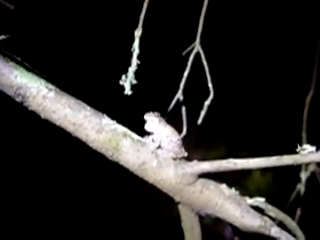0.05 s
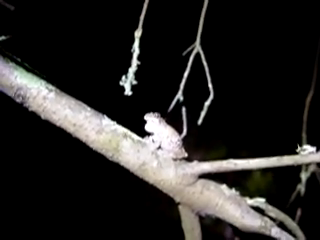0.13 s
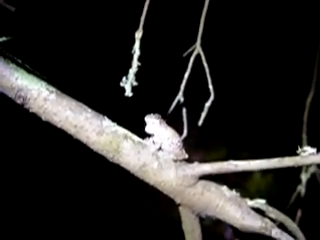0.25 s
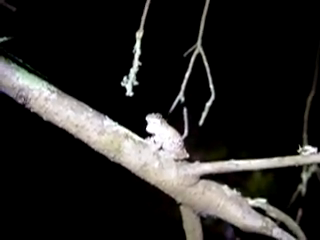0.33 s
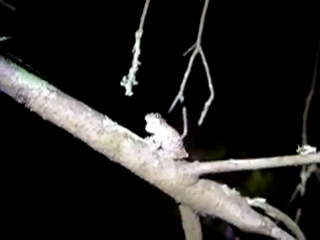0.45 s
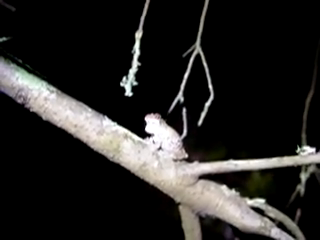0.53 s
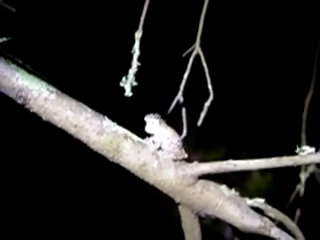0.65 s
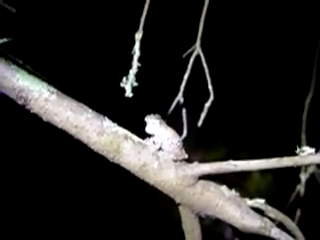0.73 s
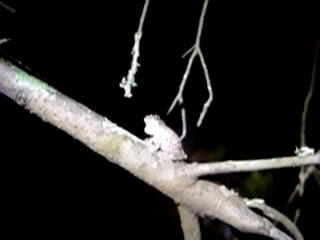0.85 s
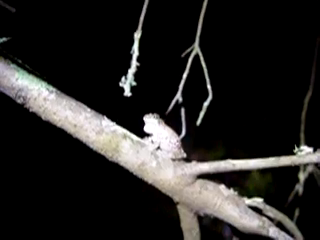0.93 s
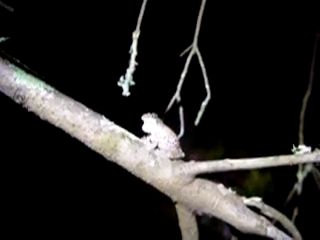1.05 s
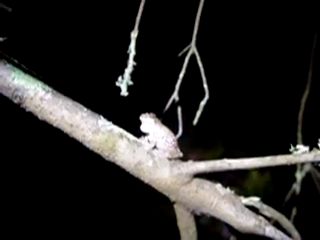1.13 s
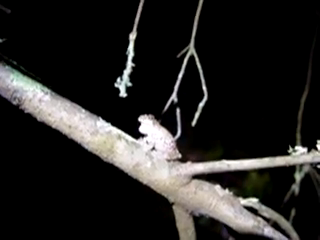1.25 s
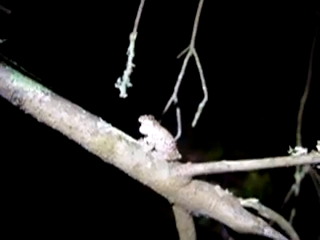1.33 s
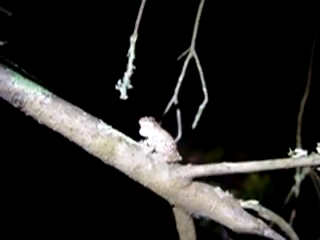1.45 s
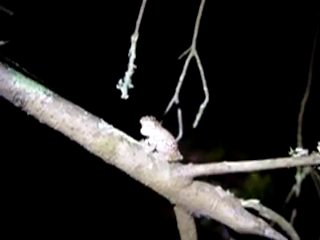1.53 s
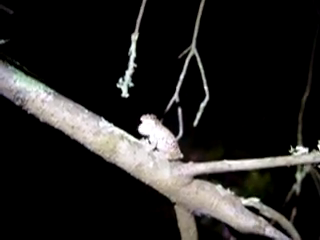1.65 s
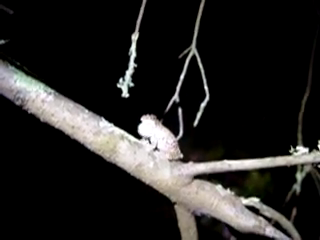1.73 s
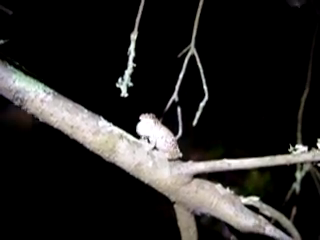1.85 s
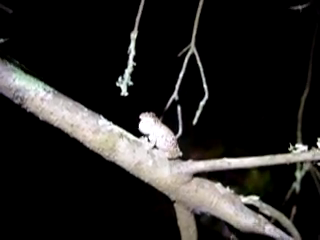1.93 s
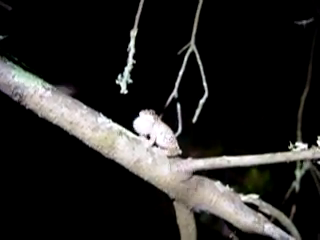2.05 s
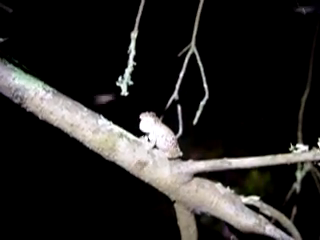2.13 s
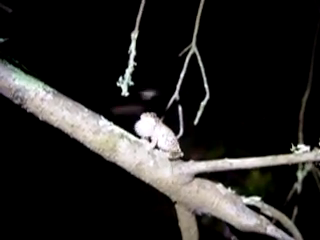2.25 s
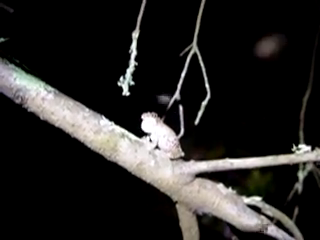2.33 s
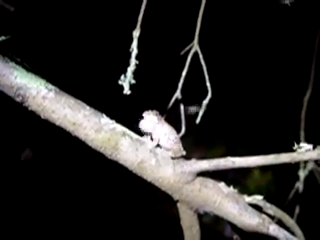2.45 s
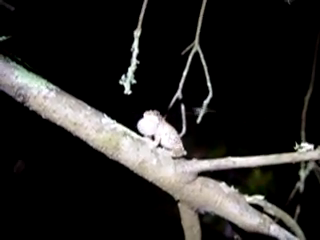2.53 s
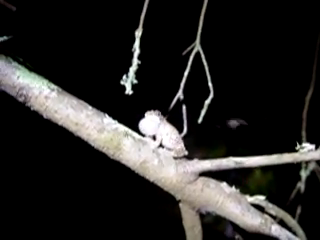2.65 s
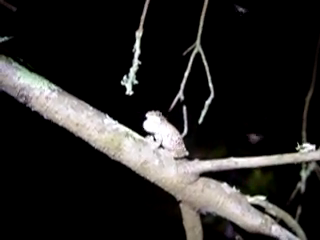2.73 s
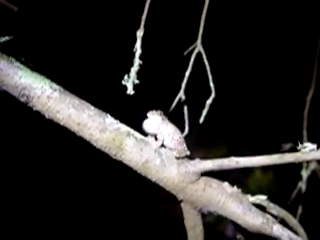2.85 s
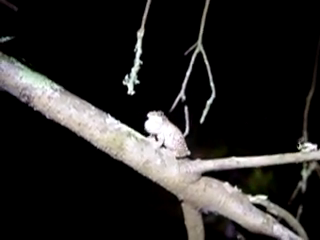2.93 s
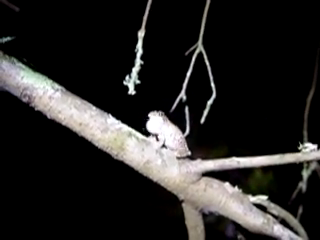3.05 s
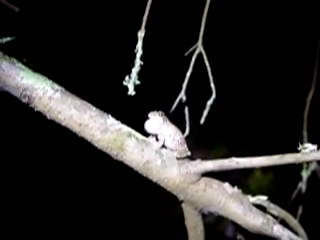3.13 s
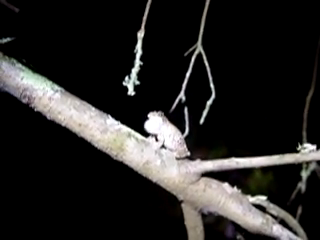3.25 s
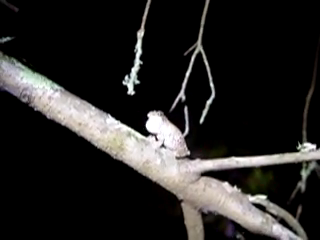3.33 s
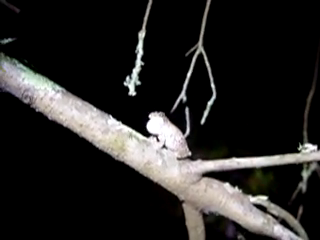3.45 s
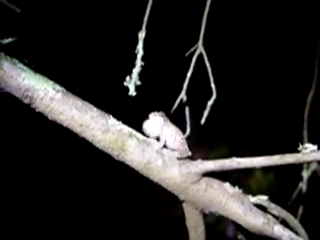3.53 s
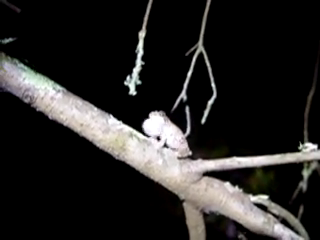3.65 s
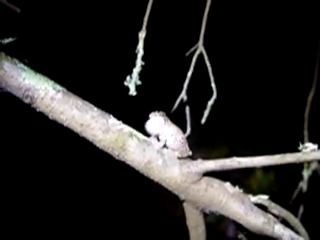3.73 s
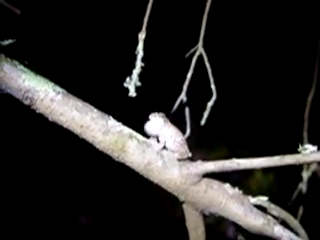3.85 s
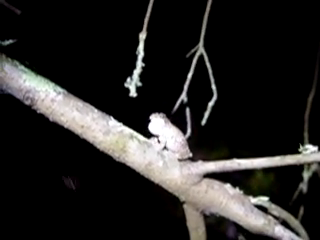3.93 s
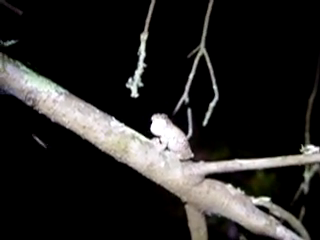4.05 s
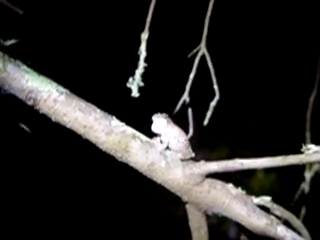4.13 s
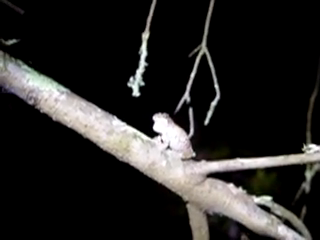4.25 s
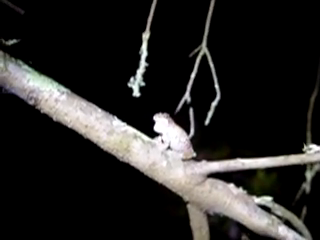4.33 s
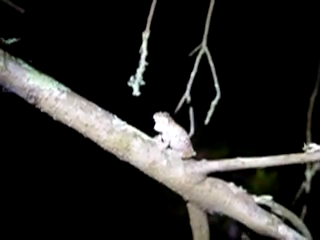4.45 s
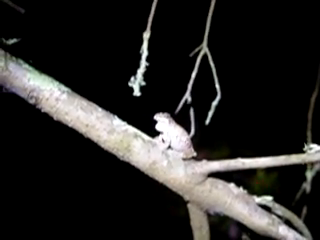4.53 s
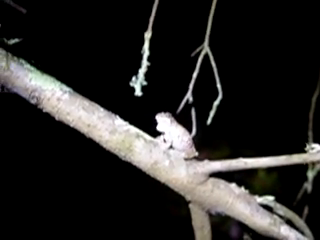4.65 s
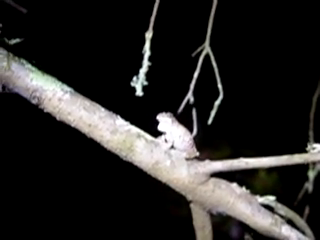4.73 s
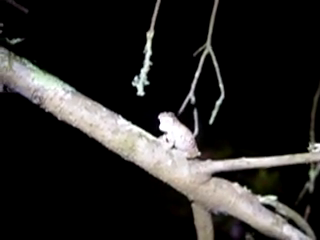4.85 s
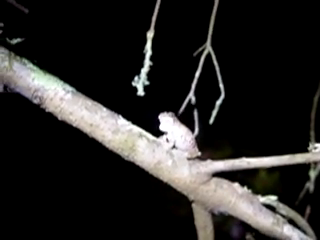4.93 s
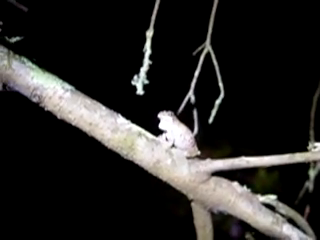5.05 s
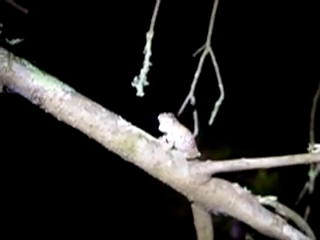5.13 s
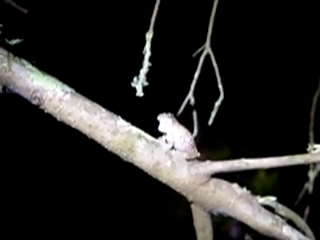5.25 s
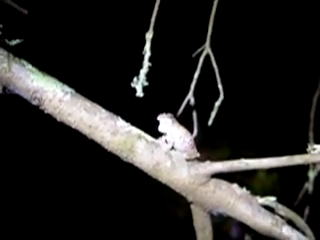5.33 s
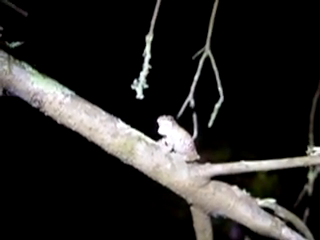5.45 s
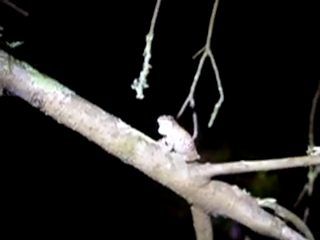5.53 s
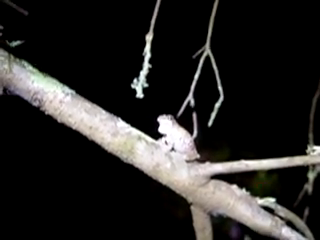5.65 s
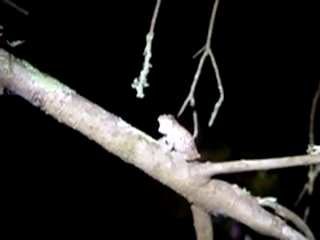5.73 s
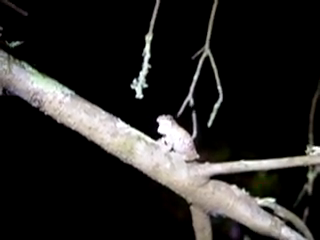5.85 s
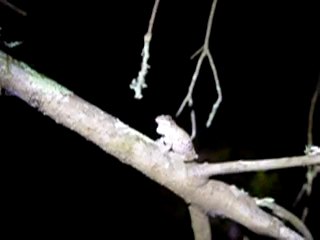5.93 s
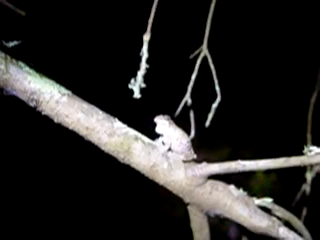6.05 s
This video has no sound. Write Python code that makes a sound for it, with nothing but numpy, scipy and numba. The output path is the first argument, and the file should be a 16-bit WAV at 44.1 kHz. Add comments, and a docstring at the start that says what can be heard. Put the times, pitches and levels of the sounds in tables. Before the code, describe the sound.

A wetland at night, with a continuous bed of insect buzz around 6 kHz, a shimmering crowd of frog clicks near 4.5 kHz, blurred far peeps, a low drone and faint soft hoots. From 0 to 1.85 s a neighbouring treefrog peeps about eight times a second near 2.4 kHz, each note swelling and rising. At 1.8 s a close treefrog begins: sixteen loud, pure peeps of about 50 ms, spaced unevenly at first, then roughly eight a second from 2.7 to 4.1 s, stronger and steadier in pitch, cutting off sharply. The microphone's gain drops, sinking the chorus, which slowly recovers. From 3.9 to 5.6 s a neighbour peeps rapidly again, joined from 4.3 s by longer, quavering distant whistles. Faint clucks at 5.1 s precede two short, low, ringing pulsed grunts at 5.65 and 5.9 s. Tiny close click rattles dot the whole.

```python
"""A treefrog on a branch close by whistles a run of loud peeps: short pure tones that swell, glide and shut off.
Its neighbours, on a wetland at night, peep and whistle further off, and another frog grunts twice in trains of
ringing pulses. Behind them are a chorus of decaying clicks, soft gliding hoots, and shaped noise for the insects,
blurred peeps, the low drone of far frogs and the night air.
The close peeps drive the recorder's gain control, so the chorus sinks and slowly comes back."""
import sys
import numpy as np
from scipy import signal
from scipy.fft import rfft, irfft, next_fast_len
from scipy.io import wavfile
from scipy.ndimage import uniform_filter1d, minimum_filter1d, map_coordinates
from numba import njit

SR = 44100
rng = np.random.default_rng(int(sys.argv[2]) if len(sys.argv) > 2 else 0)


def output_pcm(signal):
    """Save a mono or channel-first signal as 16-bit PCM at the path in sys.argv[1].

    Samples are clipped to [-1, 1] before scaling.
    """
    pcm = np.clip(np.atleast_2d(signal).T, -1, 1) * 32767
    wavfile.write(sys.argv[1], SR, np.round(pcm).astype(np.int16))


N = 268569  # length of the scene in samples

# Night air: frequency_hz, relative_level_db (per Hz)
AIR_SPECTRUM = [(20, -9), (60, -7), (150, -15.5), (270, -4), (350, -1), (600, -1.5), (1500, -2),
                (5000, -6.5), (9800, -21.5), (10500, -64.5)]
# Low drone of far frogs: frequency_hz, relative_level_db (per Hz)
DRONE_SPECTRUM = [(550, -36), (700, -16.5), (765, 5), (860, 3.5), (960, -7.5), (1150, -7.5), (1400, -24),
                  (1900, -45.5)]
# Blurred peeps of far frogs: frequency_hz, relative_level_db (per Hz)
FAR_PEEP_SPECTRUM = [(1700, -35.5), (2020, -6.5), (2200, 3.5), (2380, 0.5), (2480, 6.5), (2590, 2),
                     (2750, -3.5), (3200, -6.5), (3800, -51.5)]
# Buzzing insects: frequency_hz, relative_level_db (per Hz)
INSECT_SPECTRUM = [(4800, -22), (5300, -4.5), (5900, -0.5), (6470, 2), (6640, -11), (7150, -16),
                   (7700, -25.5), (8800, -27), (9600, -26), (10000, -39), (10400, -69.5)]
# Wash of the farthest clicking frogs: frequency_hz, relative_level_db (per Hz)
WASH_SPECTRUM = [(2600, -38), (3200, -20), (3700, -5.5), (4200, -1.5), (4680, 7), (4930, -23), (5200, -20),
                 (5800, -31.5), (7000, -50)]
# The loudest short rattles of the nearest clicking frogs: start_s, level_db
CLOSE_RATTLES = [(.082, -5.5), (.784, -10), (2.053, -5.5), (2.193, -14), (2.378, -6), (2.543, -4),
                 (2.957, -3), (4.696, -5.5), (5.802, -7), (5.818, -8)]
CHORUS_SWAY_DB = 1.4

# Upper limit of the background sounds: frequency_hz, gain_db
BACKGROUND_LOWPASS = [(10000, 0), (10800, -51.5)]
# Echoes among the trees: frequency_hz, fade_s (time to fall by 60 dB)
ECHO_FADE = [(200, 0.19), (2400, .3), (10000, 0.058)]

# Faint far hoots: start_s, length_s, start_hz, end_hz, level_db (before a shared 1 dB lift)
HOOT_CALLS = [(-.2, 0.89, 352.6, 343.6, -52), (1.1, 0.13, 677.2, 547, -53), (1.1, 0.42, 414.4, 374, -57),
              (1.5, .45, 358, 373, -53.5), (1.933, 0.12, 581, 521, -38), (4.95, 0.23, 537, 512, -58)]

# Grunts and single clucks: start_s, length_s, pulses_per_s, level_db
GRUNT_CALLS = [(5.112, .01, 54, -29), (5.161, .01, 54, -35), (5.644, .142, 54.5, -21.5),
               (5.904, 0.1, 51.5, -21.5)]
# How hard a grunt is pushed along its length: share_of_grunt (0 to 1), push_db
PUSH_SHAPE = [(0, -6), (.2, -2.5), (.45, -2.5), (.76, 1.5), (.92, -19)]
# Tones of the grunting frog's throat and body: frequency_hz, level_db, fade_s (time to fall by 60 dB)
THROAT_TONES = [(259.6, -6, 0.077), (361, 0.5, 0.017), (438, -8, 0.013), (582, -10.5, 0.02),
                (790, -20, .025), (1360, -19.5, 0.058), (1530, -12.5, 0.035), (1750, -4.5, 0.018),
                (1874, -3, 0.018), (2540, -13, .015)]
# The rasp of a grunt: frequency_hz, relative_level_db (per Hz)
WHEEZE_SPECTRUM = [(700, -29), (1000, -7.5), (1450, 3), (1850, 0), (2100, -9), (2700, -30)]

# Longer, quavering whistles further off: start_s, pitch_hz, level_db
WHISTLE_CALLS = [(4.335, 2344, -10.5), (4.768, 2330, -13.5), (5.151, 2340, -13), (5.372, 2260, -24.5),
                 (5.523, 2365, -10), (5.62, 2252, -28), (5.728, 2250, -23.5), (5.922, 2340, -11.5),
                 (5.95, 2295, -21)]
# How a distant peep or whistle swells: share_of_note (0 to 1), amplitude (0 to 1)
SWELL_SHAPE = [(0, 0), (.2, 0.073), (.38, 0.44), (.6, 0.63), (.74, 0.89), (.84, 0.31), (1, 0)]
# How its pitch rises, in full for peeps, in part for whistles: share_of_note (0 to 1), offset_hz
RISE_SHAPE = [(0, -150), (.35, -35), (.7, -7.5), (1, 29.5)]
# A neighbour's bouts: first_peak_s, last_peak_s, first_level_db, last_level_db, slowing_notes, echo_db
PEEP_BOUTS = [(-.009, 1.854, -12, -9, 1.8, -6), (3.885, 5.630, -5.5, -6.5, .95, -18.5)]
PEEP_PERIOD_S = .1218

# The close frog's notes: start_s, length_s
NEAR_NOTES = [(1.778, .037), (1.908, .043), (2.096, 0.048), (2.312, 0.053), (2.558, .056), (2.703, .050),
              (2.845, .048), (2.966, 0.043), (3.088, .045), (3.207, 0.044), (3.337, .047), (3.464, 0.048),
              (3.587, 0.051), (3.735, .052), (3.927, 0.048), (4.066, .052)]
# Its notes go from high and arched to lower and level: time_s, pitch_hz, arch_hz, level_db
# (level_db is the drive into the gain control)
NOTE_CONTROLS = [(1.779, 2461, 45, -1.5), (2.1, 2480, 75, 1.5), (2.31, 2400, 150, 1), (2.559, 2361, 160, 3),
                 (2.721, 2349, 57, 5.5), (3.05, 2362, 11, 9.5), (4.07, 2360, 12, 16)]
# The course of its pitch flick: share_of_note (0 to 1), share_of_flick (0 to 1)
FLICK_SHAPE = [(0, 0.083), (.3, .03), (.68, 0.06), (.88, 1), (1, .2)]
# Its second to sixth harmonics, in order: level_db (before the edge settings)
HARMONIC_LEVELS = [-36.5, -37.5, -43, -52.5, -57.5]
# The fine hiss on its notes: frequency_hz, relative_level_db (per Hz)
HISS_SPECTRUM = [(2000, -25), (5000, -7.5), (7400, 1.5), (8600, 5.5), (12000, 0), (15800, -5)]
ATTACK_S, RELEASE_S = 0.0054, 0.0041
SLOWER_FROM_S, ATTACK_GROWS_S_PER_S = 2.99, .026  # late in the run each note swells more slowly
FLICK_HZ, FLICK_LOST_PER_ARCH = 74, .6  # the more arched a note, the less its pitch flicks up at the end
ARCH_LATE = 1.2  # above 1 the arch peaks after the middle of the note
FLUTTER_DB = .42

TOP_HZ = 15830  # nothing above this is kept


def amp(db):
    """Turn decibels into a plain gain."""
    return 10 ** (np.asarray(db) / 20)


def unit(x):
    """Scale a sound to an average (rms) level of 1."""
    return x / np.sqrt(np.mean(x ** 2) + 1e-20)


def along(points, hz):
    """Read a curve of (frequency, value) points, evenly by pitch rather than by Hz."""
    frequencies, values = np.transpose(points)
    return np.interp(np.log(hz + 1), np.log(frequencies + 1), values)


def wobble(rate, size=N):
    """A smooth random curve around 0, with rate new random points a second."""
    points = rng.standard_normal(int(size * rate / SR) + 4)
    return map_coordinates(points, [np.arange(size) * rate / SR])


def filtered(x, response):
    """Multiply each frequency of a sound by a gain."""
    size = next_fast_len(N + SR // 2)  # spare room so the end does not wrap onto the start
    return irfft(rfft(x, size) * response(np.fft.rfftfreq(size, 1 / SR)), size)[:N]


def coloured(x, spectrum):
    """Shape a sound by a spectrum and bring it to rms 1."""
    return unit(filtered(x, lambda hz: amp(along(spectrum, hz))))


def noise(spectrum):
    """Steady hiss with a given spectrum, at rms 1."""
    return coloured(rng.standard_normal(N), spectrum)


def add(track, s, sound):
    """Mix a sound into the track at time s, dropping what falls outside."""
    at = round(s * SR) + np.arange(len(sound))
    inside = (at >= 0) & (at < N)
    track[at[inside]] += sound[inside]


def progress(length):
    """Count from 0 to 1 over a note, one value per sample."""
    return np.linspace(0, 1, int(length * SR))


def contour(points, u):
    """A shape over a note, with rounded corners."""
    return uniform_filter1d(np.interp(u, *np.transpose(points)), size=60)


def phase(hz):
    """The running angle of a tone whose pitch may glide."""
    return 2 * np.pi * np.cumsum(hz) / SR


def woods(x):
    """Scattered echoes from trunks and leaves: a fading burst of noise, each pitch fading at its own pace."""
    hz, t, grains = signal.stft(rng.standard_normal(SR // 2), SR, nperseg=256)
    fade = amp(-60 * t / along(ECHO_FADE, hz)[:, None])
    tail = signal.istft(grains * fade, SR, nperseg=256)[1]
    delayed_tail = np.pad(tail / np.linalg.norm(tail), (SR // 100, 0))  # starts 10 ms late
    return signal.fftconvolve(x, delayed_tail)[:N]


def far_chorus():
    """Crowds too far to tell apart become wavering noise: insects, blurred peeps and a drone, over steady night air."""
    insects = amp(-35.0 + 1.7 * wobble(120)) * noise(INSECT_SPECTRUM)
    peeps = amp(-31.5 + 1.9 * wobble(22)) * noise(FAR_PEEP_SPECTRUM)
    drone = amp(-41.0 + 2.1 * wobble(9)) * noise(DRONE_SPECTRUM)
    air = amp(-47.5) * noise(AIR_SPECTRUM)
    return insects + peeps + drone + air


def click_pulse(hz, click_s=0.00038):
    """One click: a tone that jumps up and dies away within a few thousandths of a second."""
    t = np.arange(SR // 200) / SR
    return t / click_s * np.exp(1 - t / click_s) * np.sin(2 * np.pi * hz * t)


def clicking_crowd(bursts_per_s=170, spread_db=4, click_hz=4450, pitch_spread=0.076):
    """Countless small frogs rattle off a few pulses, each at its own pitch, pace and distance."""
    crowd = np.zeros(N)
    for when, pace, pulses, *spread in rng.random((int(bursts_per_s * N / SR), 7)):
        # two random numbers, centred on 0 with a typical size of 1
        loudness, pitch = np.sqrt(6) * (np.array(spread[:2]) - spread[2:])
        click = amp(spread_db * loudness) * click_pulse(click_hz * np.exp(pitch_spread * pitch))
        pulses_per_s = 90 + 110 * pace
        for k in range(2 + int(5 * pulses)):
            add(crowd, when * N / SR + k / pulses_per_s, amp(-1.2 * k) * click)
    return coloured(crowd, [(2800, -13), (3500, -2.5), (4880, -0.5), (5200, -11.5), (7000, -30.5)])


def close_clickers(click_hz=4450, strays_per_s=3, stray_db=-11.5, stray_range_db=5,
                   rattle_s=0.0025, rattle_fade_db=5):
    """The nearest clicking frogs stand out as quick rattles of three fading clicks, some at random times."""
    close, strays = np.zeros(N), []
    for when, far in rng.random((int(strays_per_s * N / SR), 2)):
        strays.append((when * N / SR, stray_db - stray_range_db * far))
    for s, db in list(CLOSE_RATTLES) + strays:
        click = amp(db) * click_pulse(click_hz * rng.normal(1, 0.01))
        for k in range(3):
            add(close, s + k * rattle_s, amp(-k * rattle_fade_db) * click)
    return close


def clicking_chorus():
    """The crowd of clicks and the wash of the farthest frogs sway in level together, under the nearest rattles."""
    background = amp(-25) * clicking_crowd() + amp(-27.5) * noise(WASH_SPECTRUM)
    return background * amp(CHORUS_SWAY_DB * wobble(45)) + close_clickers()


def hoots(waver_hz=7, flutter_db=0.9):
    """Soft low tones from far away glide in pitch, blurred by the trees."""
    out = np.zeros(N)
    for s, length, start_hz, end_hz, db in HOOT_CALLS:
        u = progress(length)
        level = amp(db + flutter_db * wobble(45, len(u)))
        swell = np.sqrt(np.abs(np.sin(np.pi * u)))
        pitch_hz = start_hz + (end_hz - start_hz) * u + waver_hz * wobble(40, len(u))
        add(out, s, level * swell * np.sin(phase(pitch_hz)))
    return amp(1.0) * out + woods(out)


def throat_ring(t, scatter_db):
    """One pulse sets the tones of the throat and body ringing, each fading at its own pace."""
    ring = np.zeros(len(t))
    for hz, level, fade_s in THROAT_TONES:
        fading_db = level + rng.normal(0, scatter_db) - 60 * t / fade_s
        ring += amp(fading_db) * np.sin(2 * np.pi * hz * t)
    return ring


def grunter(scatter_db=1.4, rasp_db=-16, wheeze_db=-21):
    """Each grunt is a short train of pulses, strongest late on, that ring the throat over a fine rasp."""
    out, t, wheeze = np.zeros(N), np.arange(SR // 6) / SR, noise(WHEEZE_SPECTRUM)
    for s, length, rate, db in GRUNT_CALLS:
        u = progress(length)
        breath = wheeze[round(s * SR):][:len(u)]
        add(out, s, amp(db + wheeze_db + contour(PUSH_SHAPE, u)) * breath)
        for delay in np.arange(0, length, 1 / rate):
            push_db = np.interp(delay / length, *np.transpose(PUSH_SHAPE))
            pulse = amp(db + push_db) * throat_ring(t, scatter_db)
            add(out, s + delay + rng.normal(0, .0001), pulse)
    out = out * (1 + amp(rasp_db) * wobble(1500))
    # a small body radiates no deep bass
    out = filtered(out, lambda hz: amp(along([(150, -43.0), (210, -19), (245, 1.5)], hz)))
    return out + amp(-9) * woods(out)


def whistlers(length=0.0993, quaver_db=5.5, glide=.4):
    """Other treefrogs draw the note out, with a quick quaver in its loudness and a smaller rise in pitch."""
    out, u = np.zeros(N), progress(length)
    for s, hz, db in WHISTLE_CALLS:
        level = amp(db + quaver_db * np.tanh(wobble(177, len(u))))
        tone = np.sin(phase(hz + glide * contour(RISE_SHAPE, u)))
        add(out, s, level * contour(SWELL_SHAPE, u) * tone)
    return out + amp(-12) * woods(out)


def neighbour(hz=2395, length=.056, echo_s=.027):
    """Peeps eight a second swell as they rise; each bout slows at its end, and a trunk throws the notes back."""
    out, u = np.zeros(N), progress(length)
    swell = contour(SWELL_SHAPE, u)
    for first, last, first_db, last_db, slowing, echo_db in PEEP_BOUTS:
        beats = np.arange(first, last, PEEP_PERIOD_S)
        # the delay grows towards the end, so that the final peak lands on its time
        lag = (last - beats[-1]) * np.exp((beats - beats[-1]) / (slowing * PEEP_PERIOD_S))
        for peak, db in zip(beats + lag, np.linspace(first_db, last_db, len(beats))):
            level = amp(db + 2.0 * wobble(200, len(u)))
            pitch_hz = hz + contour(RISE_SHAPE, u) + rng.normal(0, 6)
            note = level * swell * np.sin(phase(pitch_hz))
            start = peak - .74 * length  # the swell is fullest at this share of the note
            add(out, start, note)
            add(out, start + echo_s, amp(echo_db) * swell * note)
    return out + amp(-15.5) * woods(out)


def after_blip(length=.014, hz=2290, spread_hz=55, db=-26.5):
    """A soft, lower blip just after the close frog shuts off a note."""
    u = progress(length)
    tone = np.sin(2 * np.pi * rng.normal(hz, spread_hz) * length * u)
    return amp(db + rng.uniform(-2, 2)) * np.sin(np.pi * u) * tone


def near_frog(waver_hz=9, swell_db=3, drop_hz=160, rasp_db=-44, edge_grows=0.25, edge_flutter_db=6.0):
    """The vocal sac rings as one fluttering tone that swells, then sags as it shuts; stronger drive is purer."""
    out, rasp = np.zeros(N), noise(HISS_SPECTRUM)
    times, *controls = np.transpose(NOTE_CONTROLS)
    for s, length in NEAR_NOTES:
        hz, arch_hz, db = (np.interp(s, times, control) for control in controls)
        u = progress(length)
        attack_s = ATTACK_S + ATTACK_GROWS_S_PER_S * max(s - SLOWER_FROM_S, 0)
        opening = np.minimum(u * length / attack_s, 1)
        closing = np.minimum((1 - u) * length / RELEASE_S, 1)

        arch = arch_hz * np.sin(np.pi * u ** ARCH_LATE) ** 2
        flick = (FLICK_HZ - FLICK_LOST_PER_ARCH * arch_hz) * contour(FLICK_SHAPE, u)
        sag = drop_hz * (1 - closing)
        turn = phase(hz + arch + flick - sag + waver_hz * wobble(500, len(u)))

        # the edge (harmonics and hiss) grows less with the drive than the main tone
        edge = amp(rasp_db) * rasp[round(s * SR):][:len(u)]
        for k, level in enumerate(HARMONIC_LEVELS, 2):
            edge = edge + amp(level + 3.4 * wobble(160, len(u))) * np.sin(k * turn)
        edge = edge * amp(edge_grows * db + edge_flutter_db * wobble(220, len(u)))

        swell = amp(swell_db * (u - 1) + FLUTTER_DB * wobble(1000, len(u)))
        envelope = opening * closing ** 2 * swell
        add(out, s, envelope * (amp(db) * np.sin(turn) + edge))
        add(out, s + length + rng.uniform(.002, 0.0059), amp(db) * after_blip())
    return out + amp(-33.5) * woods(out)


def scene():
    """All sounds meet at one microphone; the background stops near 10 kHz, the close frog reaches higher."""
    background = far_chorus() + clicking_chorus() + hoots() + grunter() + whistlers() + neighbour()
    limited_background = filtered(background, lambda hz: amp(along(BACKGROUND_LOWPASS, hz)))
    return (near_frog() + limited_background)[None]


def microphone(x, overload=0.51, thump=0.021, thump_grows=.3, thump_top_hz=550, unevenness=.22):
    """Crests that overload the capsule shift its rest point with a soft, uneven thump."""
    load = uniform_filter1d(np.abs(x), size=74) / overload
    strain = np.tanh(load ** 4) * np.abs(load) ** thump_grows
    strain = strain * (1 + unevenness * wobble(900))

    def thump_band(hz):
        """Keep the low frequencies, without the steady offset."""
        return 1j * hz / (4 + 1j * hz) / (1 + (hz / thump_top_hz) ** 4)

    return x + thump * filtered(strain, thump_band)


@njit
def follow(excess, attack, release):
    """Gain reduction that climbs to the excess level and relaxes, with time constants in samples."""
    out, held = np.zeros(len(excess)), 0.0
    for i in range(len(excess)):
        held += (excess[i] - held) / (attack if excess[i] > held else release)
        out[i] = held
    return out


def gain_control(x, ceiling_db, attack_s, release_s):
    """Turn the sound down while its crests pass the ceiling."""
    crests = -minimum_filter1d(-np.abs(x), size=96)  # the highest sample nearby
    excess_db = np.maximum(20 * np.log10(crests + 1e-9) - ceiling_db, 0)
    reduction_db = follow(excess_db, attack_s * SR, release_s * SR)
    return x * amp(-uniform_filter1d(reduction_db, size=90))


def record(dry, top=0.72):
    """A slow gain control, a quick limiter, clipping of the crests that slip through, and the band limit."""
    x = gain_control(microphone(dry[0]), ceiling_db=1.0, attack_s=0.04, release_s=1.0)
    x = gain_control(x, ceiling_db=-2.5, attack_s=0.00015, release_s=0.016)
    clipped = np.clip(x, -top, top)
    return filtered(clipped, lambda hz: hz < TOP_HZ)[None]


dry = scene()
out = record(dry)
output_pcm(out)
```